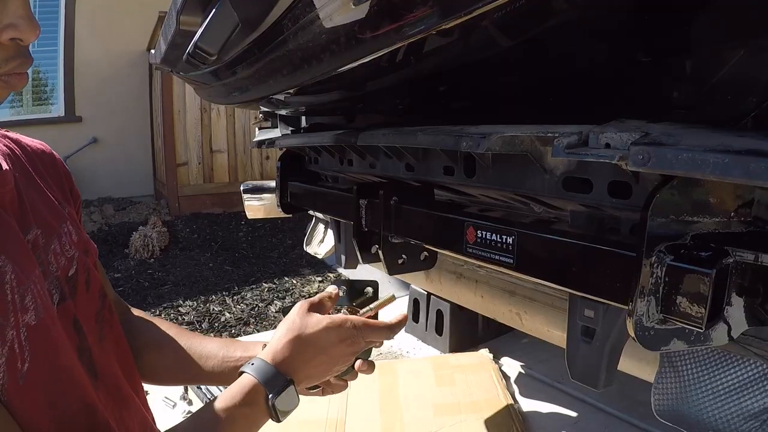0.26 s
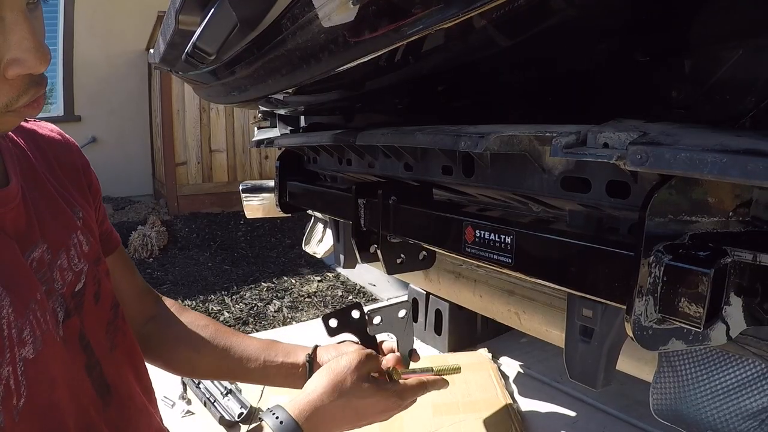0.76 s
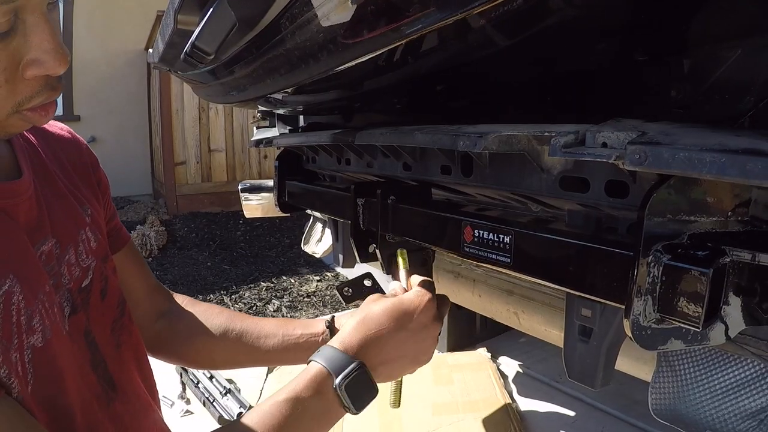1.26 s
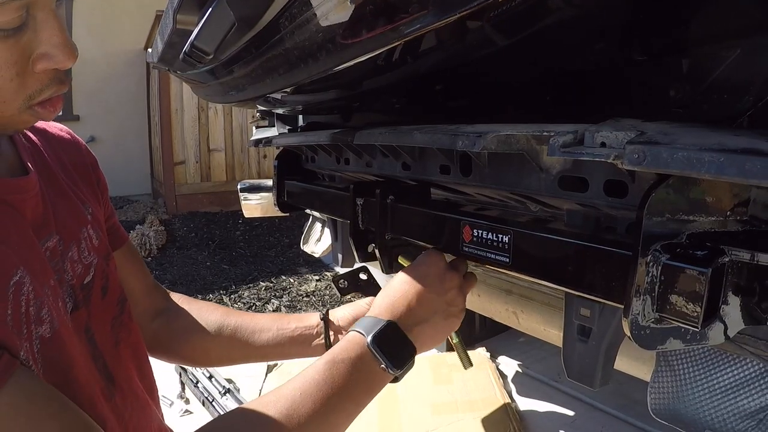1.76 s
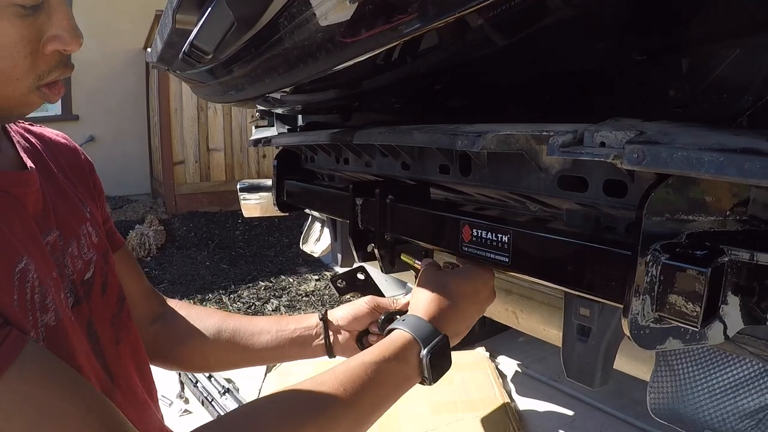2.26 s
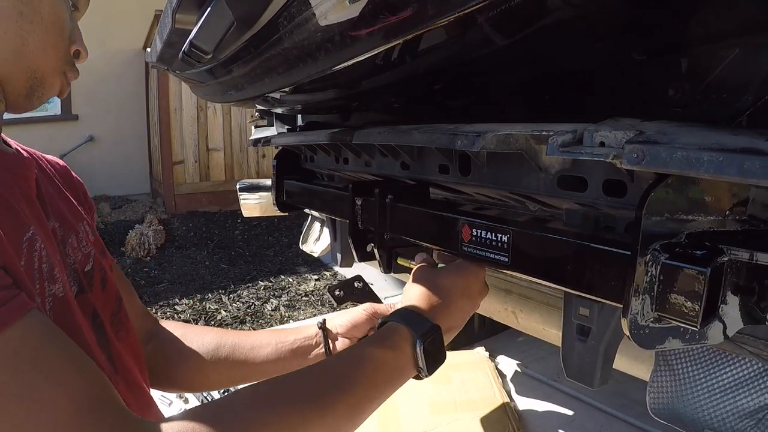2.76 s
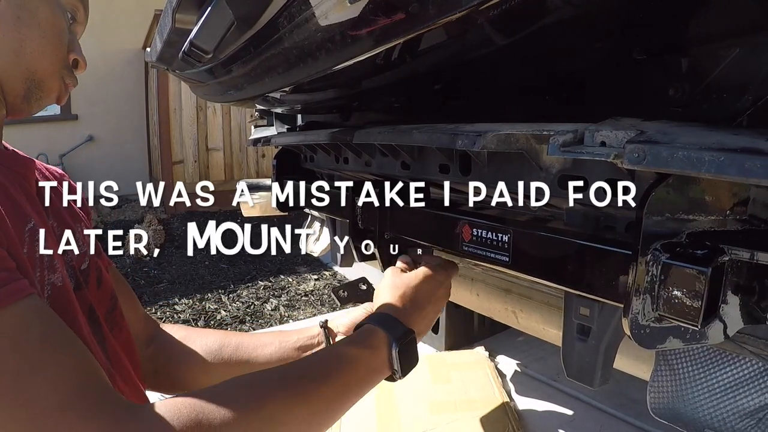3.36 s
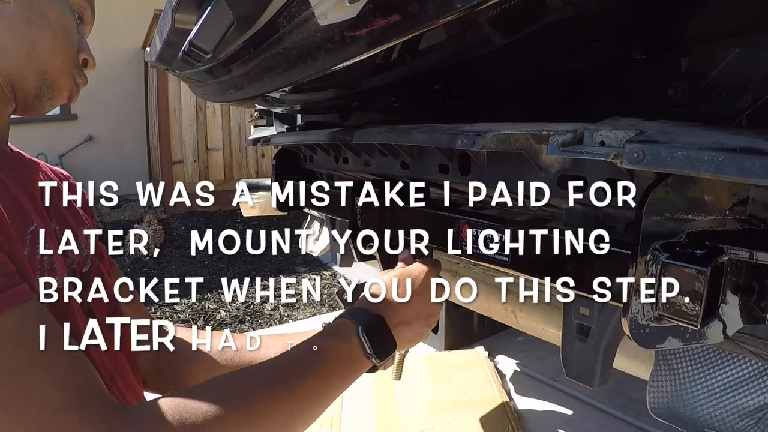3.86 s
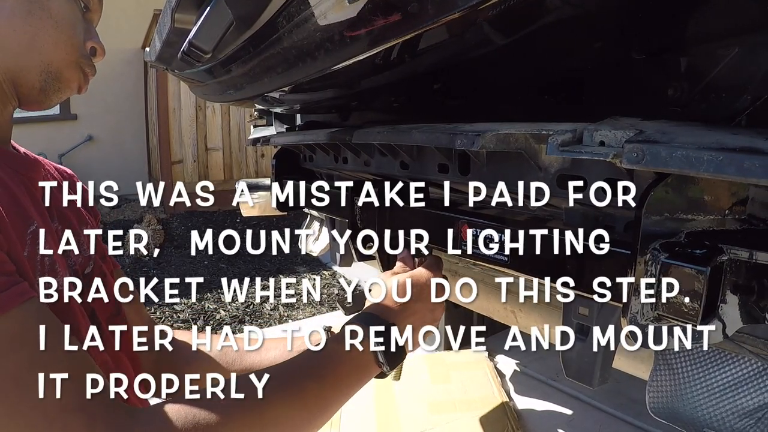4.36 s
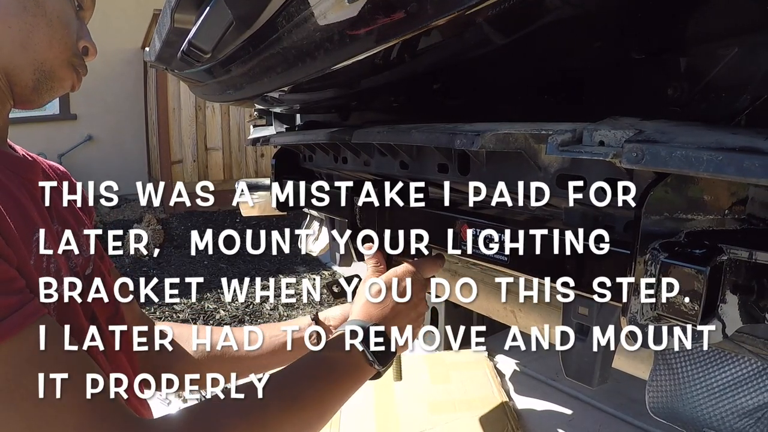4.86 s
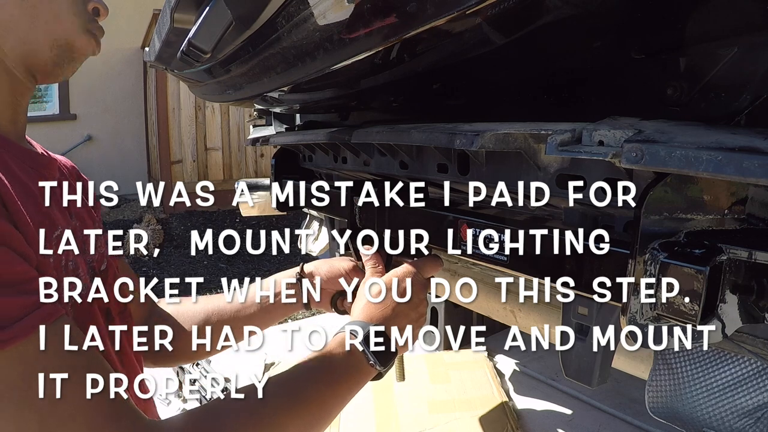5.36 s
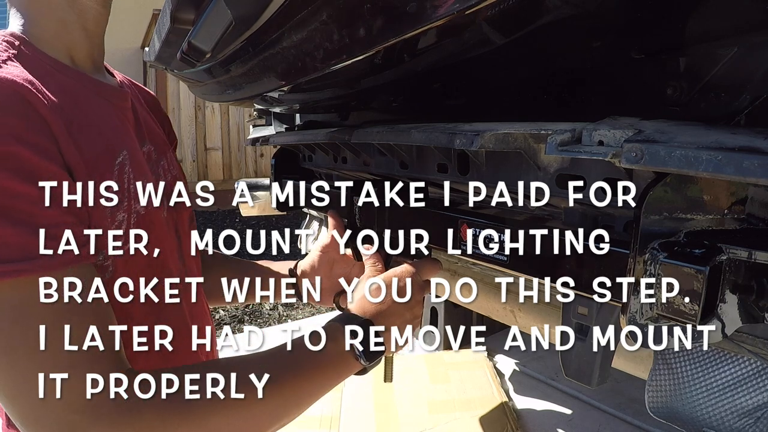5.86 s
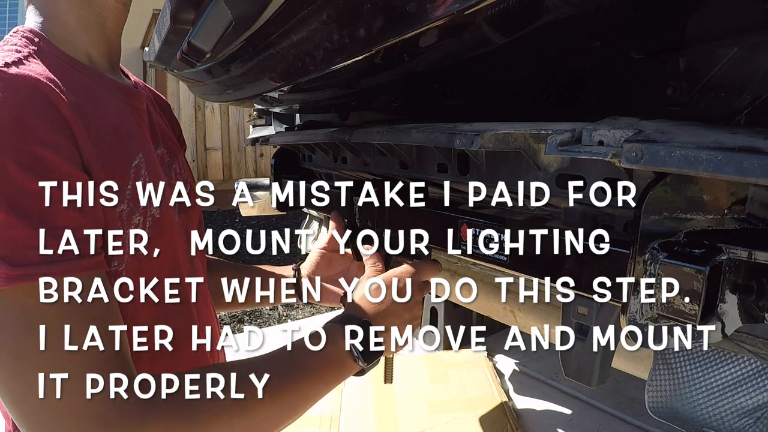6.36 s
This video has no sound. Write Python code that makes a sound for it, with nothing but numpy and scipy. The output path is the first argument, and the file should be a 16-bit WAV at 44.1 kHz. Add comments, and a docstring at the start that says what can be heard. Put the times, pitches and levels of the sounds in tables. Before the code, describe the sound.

Steel parts are handled close by, slightly to the right, under a truck outdoors. Low wind rumble on the microphone, a faint town hiss and a distant engine drone run throughout; the engine dips in pitch at first, then slowly climbs. From about 0.4 seconds a plate clinks lightly, with small ticks. Between 1 and 1.7 seconds a bracket gives a quick run of brighter, ringing clinks. From 2.3 to 3.6 seconds come harder metallic strikes with thuds in the frame, the strongest near 2.7, 3 and 3.6 seconds, and bolt threads rasp briefly around 3 seconds as the wind grows. A few duller knocks follow near 4 seconds, then the handling pauses and the engine swells around 4.5 seconds. At 5.5 seconds a bolt knocks sharply several times, a hand hisses faintly along the steel, and lighter knocks continue until about 6.3 seconds.

```python
"""Steel clinks, knocks and scrapes close by: hands fit a plate, a bracket and long bolts under a truck.
Each blow cracks, rings the parts that touch and thuds in the frame; a bolt's threads rasp through
their hole, and a hand hisses along the steel. Down the street an engine slows, then pulls away
with a rising drone, over wind rumble and the hiss of the town."""
import sys
import numpy as np
from scipy import signal
from scipy.fft import rfft, irfft, next_fast_len
from scipy.io import wavfile
from scipy.ndimage import uniform_filter1d

SR = 44100
rng = np.random.default_rng(int(sys.argv[2]) if len(sys.argv) > 2 else 0)


def generate_wav(sig):
    """Save sig (samples, or channels by samples) to the path in sys.argv[1] as 16-bit PCM at SR."""
    pcm = np.round(np.clip(np.atleast_2d(sig).T, -1, 1) * 32767).astype(np.int16)
    wavfile.write(sys.argv[1], SR, pcm)


N = 291501
TIME = np.arange(N) / SR
SIDE = np.array([[.5], [-.5]])  # splits a level or phase offset between left and right

# The modes of the three steel parts. Each row: pitch in Hz, level in dB, T60 in seconds.
PLATE_MODES = [(1325, -7, .16), (1755, -12, .14), (2130, -9, .12), (2225, 3, .17), (2280, -3, .13),
               (2465, -13, .18)]
BRACKET_MODES = [(3500, 1, .18), (3607, -9, .13), (5000, -14, .13), (6340, -15, .09), (6720, -17, .07),
                 (7106, -10, .14), (7320, -15, .09), (9000, -28, .06), (11300, -31, .06), (12600, -34, .05)]
BOLT_MODES = [(2320, 1, .26), (2896, -1, .26), (3585, -2, .2), (5015, -15, .24), (6870, -20, .13),
              (7300, -14, .12)]
PARTS = {"plate": PLATE_MODES, "bracket": BRACKET_MODES, "bolt": BOLT_MODES}
# The tone of steel meeting steel. Each row: frequency in Hz, level in dB.
CRACK_EQ = [(150, -35), (600, -17), (2000, 7.5), (4500, 2), (7700, -4), (8300, -14), (11000, -27),
            (15000, -52)]


def clinks():
    """Steel on steel: a snap, a crack and a rough tail, while the frame thuds and the parts ring."""
    # The blows. Each row: start in seconds, crack level in dB, hardness in dB per octave,
    # part struck, ring level in dB, thud level in dB.
    strikes = [(0.3902, -23, -0.5, "plate", -29.5, -30), (0.457, -25, 9, "plate", -35.5, -42),
               (0.6072, -38, 21, "plate", -36, -44.5), (1.034, -10.5, -5, "both", -19.5, -27),
               (1.1951, -12, 7.5, "bracket", -14.5, -36.5), (1.262, -21, -3.5, "both", -29.5, -45),
               (1.396, -17, -18, "both", -26.5, -40), (1.4393, -12.5, 4, "bracket", -22.5, -33.5),
               (1.5222, -11, 7, "bracket", -17, -35.5), (1.6232, -5.5, 8, "bracket", -20.5, -43.5),
               (1.6429, -5.5, 10, "bolt", -37, -36.5), (2.299, -22, -7.5, "both", -29.5, -31),
               (2.311, -21, 0.5, "both", -33, -41), (2.446, -28.5, 2, "bracket", -41, -65),
               (2.5663, -13.5, -2, "both", -31, -31), (2.597, -25, -19.5, "both", -43, -35.5),
               (2.715, -17.5, -8, "both", -36, -63), (2.726, -2.5, 4.5, "both", -19, -21.5),
               (2.933, -28, -5.5, "bracket", -22.5, -30.5), (2.9548, -3.5, 23.5, "both", -19, -30.5),
               (3.035, -16, 5, "bracket", -49, -27), (3.135, -6.5, 24, "both", -22.5, -31),
               (3.2219, -9.5, 5, "bracket", -24, -31), (3.3265, -17, 8, "bracket", -30, -43.5),
               (3.551, -7.5, -5, "bracket", -9, -28), (3.895, -29, -8.5, "bolt", -51.5, -33),
               (4.12, -11, -8.5, "bolt", -57, -28), (5.5174, -1, -8, "bolt", -23.5, -29.5),
               (5.5445, -8, -6.5, "bolt", -28, -24.5), (5.6061, -8.5, -7, "bolt", -28.5, -24),
               (5.778, -19.5, -4, "bolt", -38, -30.5), (6.0115, -15.5, -8, "bolt", -35, -27),
               (6.332, -20, -8.5, "bolt", -39.5, -28)]
    # Touching parts shake each other. For each part struck: gain in dB of plate, bracket and bolt.
    coupling = {"plate": (0, -15, -13), "bracket": (-7.5, 0, -21), "bolt": (-9, 0.5, 0),
                "both": (0.013, 0, -23)}
    pressed_s, gripped_s = 1.5, 5.7  # pressed to the frame, then held tighter, the parts die faster
    out = np.zeros((2, N))
    for start, crack_db, hardness, part, ring_db, thud_db in strikes:
        crack = burst(CRACK_EQ, hardness, t60=.047)
        snap = undb(5) * burst(CRACK_EQ, hardness, t60=.005)
        thud = undb(thud_db) * frame_thud()
        crunch = undb(-13) * burst(CRACK_EQ, tilt_db=-8, t60=.24)
        hit = undb(crack_db) * (crack + snap + crunch) + thud
        damp = 1.5 if start > gripped_s else 1.41 if start > pressed_s else 1
        ring_tilt = .68 * np.clip(hardness, -1, 12)  # harder blows ring brighter
        for gain_db, modes in zip(coupling[part], PARTS.values()):
            hit += undb(ring_db + gain_db) * ring(brighten(modes, ring_tilt), damp)
        add_contact(out, start, hit)
    return out


def bolt_song(hz=7220, t60=.54):
    """Two hard blows leave a loose bolt singing along its length."""
    # The singing notes. Each row: start in seconds, level in dB.
    notes = [(2.728, -36), (3.551, -38)]
    t = np.arange(SR // 2) / SR
    out = np.zeros(N)
    for start, db in notes:
        out[int(start * SR):][:len(t)] += undb(db - 60 * t / t60) * np.sin(2 * np.pi * hz * t)
    return out


def knocks():
    """Held parts and knuckles bump the frame: a thud with a dull crack."""
    # The bumps. Each row: start in seconds, level in dB.
    bumps = [(2.497, -27.5), (2.849, -30.5), (3.35, -26), (4.032, -29), (4.227, -26.5), (5.648, -25.5),
             (5.683, -25.5), (5.752, -21), (5.889, -31), (6.224, -32.5)]
    out = np.zeros((2, N))
    for start, db in bumps:
        knock = undb(-7.5) * frame_thud() + burst(CRACK_EQ, tilt_db=-12, t60=.047)
        add_contact(out, start, undb(db) * knock)
    return out


def ticks():
    """Small parts touch lightly: short, high pings of band-limited noise."""
    # The touches. Each row: start in seconds, level in dB, pitch in Hz.
    touches = [(.628, -37, 7000), (0.729, -33, 4670), (.797, -37.5, 5230), (0.903, -30, 3600),
               (2.288, -31.5, 4700), (4.201, -30, 4300)]
    out = np.zeros((2, N))
    for start, db, hz in touches:
        band = [(hz / 2, -60), (hz / 1.4, -3), (hz * 1.23, -3), (hz * 2, -60)]
        add_contact(out, start, undb(db) * burst(band, tilt_db=0, t60=.07))
    return out


def bolt_drag(catches_per_s=280):
    """Threads catch on the edge of a hole: dense, uneven ticks shake every body, with grit on top."""
    # How hard the bolt bears on the edge. Each row: start, swell time and fade time in seconds,
    # then peak level, swell depth and fade depth in dB.
    strokes = [(2.477, 0.077, 0.043, -38.5, 18, 33), (2.921, 0.039, 0.053, -17, 27, 28),
               (3.033, 0.062, 0.1, -13.5, 9, 16)]
    # The balance of the scrape: a level in dB for each body and for the grit.
    mix_db = {"plate": -9, "bracket": -4, "bolt": -10, "frame": -4, "grit": -6}
    pressure = np.zeros(N)
    for start, swell, fade, peak_db, swell_db, fade_db in strokes:
        ramp_db = [peak_db - swell_db, peak_db, peak_db - fade_db]
        pressure += undb(np.interp(TIME - start, [0, swell, swell + fade], ramp_db, -200, -200))
    grit = colour(stereo_noise(N, alike=.62) * undb(3 * wander(150)), CRACK_EQ)
    out = level(grit, mix_db["grit"]) * pressure
    bodies = {name: ring(brighten(modes, tilt_db=2), damp=2.2) for name, modes in PARTS.items()}
    # Light ticks barely move the low end of the frame.
    bodies["frame"] = colour(frame_thud(), [(100, 5.5), (1300, -2), (2600, -15.5)], tilt_db=5)
    for name, body in bodies.items():
        catches = (rng.random(N) < catches_per_s / SR) * undb(5 * rng.exponential(size=N))
        catches *= np.sign(rng.standard_normal(N))
        response = level(body, mix_db[name]) / np.sqrt(body.shape[1])
        out += signal.fftconvolve(response, (level(catches, 0) * pressure)[None])[:, :N]
    return out


def frame_thud():
    """The struck underbody: loose, shifting modes in a wash of clatter."""
    # The frame's main modes. Each row: pitch in Hz, level in dB, T60 in seconds.
    frame_modes = [(258, 1, .2), (413, -8, .25), (638, -14, .25), (1000, -3, .17), (1290, -2, .1),
                   (1843, -14, .1), (2087, -15, .05)]
    # Its countless damped modes, blurred into noise. Each row: frequency in Hz, level in dB.
    clatter_eq = [(90, 0), (220, 13.5), (1200, 4), (2500, -14), (5000, -44.5)]
    tones = ring(frame_modes, scatter=.0288, rattle_db=3.5)
    return tones + undb(10.5) * burst(clatter_eq, tilt_db=0, t60=.34)


def hand_slide():
    """A hand slides along the steel: a thin, slightly uneven friction hiss."""
    # The swell of the stroke. Each row: time in seconds, level in dB.
    stroke = [(5.62, -79), (5.66, -52), (5.73, -45), (5.8, -48), (5.89, -58), (5.91, -78)]
    # The tone of the friction. Each row: frequency in Hz, level in dB.
    friction_eq = [(2500, -19), (4500, -14), (6600, -6.5), (8500, -18.5), (11000, -42)]
    hiss = level(colour(stereo_noise(N, alike=.4), friction_eq), 0) * undb(2 * wander(43))
    return hiss * undb(curve(stroke, outside=-200))


def engine():
    """A far exhaust drones at its firing rate, swelling and sinking on its way between the houses."""
    # The swells of the firing tone and of its second harmonic. Each row: time in seconds, level in dB.
    firing_swells = [(0, -24), (.35, -20), (.48, -23), (.7, -18), (1, -32.5), (1.25, -21.5), (1.95, -32),
                     (2.15, -26.5), (2.5, -31.5), (3.5, -27), (4, -25), (4.2, -31), (4.45, -14),
                     (4.85, -24), (5.1, -20.5), (6.12, -43.5), (6.3, -25), (6.61, -29)]
    second_swells = [(0, -52.5), (.55, -29), (.85, -29.5), (1.15, -36.5), (6.61, -47)]
    low_hz, turn_s, sag_hz_per_s, climb_hz_per_s = 70.55, .55, 32, 5.7
    since_turn = TIME - turn_s
    firing_hz = low_hz + np.maximum(-sag_hz_per_s * since_turn, climb_hz_per_s * since_turn)
    firing_hz = uniform_filter1d(firing_hz, int(.28 * SR), mode="nearest")  # rounds the turn
    phase = 2 * np.pi * np.cumsum(firing_hz * (1 + .0045 * wander(13))) / SR
    firing_db = curve(firing_swells)
    out = np.zeros((2, N))
    for harmonic, db in ((1, firing_db), (2, curve(second_swells)), (4, firing_db - 37.5)):
        gain = undb(db + 2.2 * wander(8.8) - 2 * SIDE)
        out += np.sqrt(2) * gain * np.sin(harmonic * (phase + .11 * SIDE))
    return out


def wind():
    """Wind buffets the microphone: a low rumble, mostly unrelated left and right."""
    # The strength of the wind. Each row: time in seconds, level in dB.
    strength = [(0, -31), (2.5, -37.5), (2.9, -22.5), (4.3, -28), (6.61, -29)]
    rumble_eq = [(10, -8), (52, 0), (104, -5), (250, -30), (2000, -90)]
    gusts = colour(stereo_noise(N, alike=.25), rumble_eq) * undb(3 * wander(12))
    return level(gusts, 0) * undb(curve(strength) - 2.4 * SIDE)


def town():
    """The far hiss of the town: its low band wavers under a nearly steady top."""
    # The tone of the town. Each row: frequency in Hz, level in dB.
    town_eq = [(65, -14), (110, -8), (177, -18), (301, -26.5), (582, -29), (1440, -29.5), (3340, -44.5),
               (9540, -50), (12500, -59.5), (15000, -99)]
    low = colour(stereo_noise(N, alike=.25), [(300, .5), (700, -9)]) * undb(3.1 * wander(11))
    high = colour(stereo_noise(N, alike=.0086), [(200, -19), (500, -3)]) * undb(.12 * wander(.23))
    hiss = colour(low + high, [(40, -62.5)] + town_eq)
    return level(hiss, -37) * undb(-1.5 * SIDE)


def ring(modes, damp=1, scatter=.0041, rattle_db=4, seconds=.3):
    """A struck body rings; each blow varies the pitch, decay, strength and direction of every mode."""
    hz, db, t60 = np.transpose(modes)[:, :, None]
    t = np.arange(int(seconds * SR), dtype=np.float32) / SR
    detune, strength, pan, skew, loss = rng.standard_normal((5, len(modes), 1))
    decay_rate = np.log(1000) * damp / t60 * undb(1.2 * loss)
    waves = np.exp((2j * np.pi * hz * (1 + scatter * detune) - decay_rate) * t)
    # Loose parts keep brushing their neighbours, so every mode flutters within milliseconds.
    steps = rng.standard_normal((len(modes), len(t) // 256 + 1))
    flutter = uniform_filter1d(np.repeat(steps, 256, axis=1)[:, :len(t)], size=256)
    waves *= undb(rattle_db * flutter)
    gains = undb(db + 2 * strength + 1.58 * pan * SIDE.T) * np.exp(.6j * skew * SIDE.T)
    return (gains.T @ waves).imag * np.minimum(t / .0015, 1)


def burst(eq, tilt_db, t60, seconds=.3):
    """Coloured noise that starts sharply and falls 60 dB in t60 seconds."""
    t = np.arange(int(seconds * SR)) / SR
    noise = level(colour(stereo_noise(len(t), alike=.69), eq, tilt_db), -9)
    return noise * undb(-60 * t / t60) * np.minimum(t / .00027, 1)


def add_contact(out, start, sound, skid_s=.005):
    """Mix in a sound as a tiny skid: a first touch and three weaker ones."""
    touches = np.zeros(SR // 40)
    delay, strength = rng.random((2, 4))
    touches[(skid_s * delay * np.arange(4) * SR).astype(int)] = .65 * strength
    touches[0] = .66
    sound = signal.fftconvolve(sound, touches[None] / np.linalg.norm(touches))
    i = int(start * SR)
    out[:, i:i + sound.shape[1]] += sound[:, :N - i]


def brighten(modes, tilt_db):
    """Tilt the levels of modes by tilt_db per octave about 3 kHz."""
    return [(hz, db + tilt_db * np.log2(hz / 3000), t60) for hz, db, t60 in modes]


def colour(x, eq, tilt_db=0):
    """Equalise by (Hz, dB) points, plus a tilt per octave about 3 kHz that levels off at 8.5 kHz."""
    size = next_fast_len(x.shape[-1], real=True)
    hz = np.maximum(np.fft.rfftfreq(size, 1 / SR), 10)
    eq_hz, eq_db = np.transpose(eq)
    db = np.interp(np.log(hz), np.log(eq_hz), eq_db) + tilt_db * np.log2(np.minimum(hz, 8500) / 3000)
    return irfft(rfft(x, size) * undb(db), size)[..., :x.shape[-1]]


def stereo_noise(count, alike):
    """White noise whose left and right have the correlation `alike`."""
    common, opposed = rng.standard_normal((2, count))
    return np.sqrt((1 + alike) / 2) * common + np.sqrt((1 - alike) / 2) * opposed * 2 * SIDE


def wander(rate):
    """A smooth random drift, `rate` steps a second, with a spread near 1."""
    hold = int(SR / rate)
    steps = np.repeat(rng.standard_normal(N // hold + 1), hold)
    return 1.13 * uniform_filter1d(uniform_filter1d(steps, hold), hold)[:N]


def curve(points, outside=None):
    """Join (seconds, value) points with straight lines over the whole scene."""
    return np.interp(TIME, *np.transpose(points), left=outside, right=outside)


def level(x, db):
    """Scale to an RMS level in dB."""
    return x * undb(db) / np.sqrt(np.mean(x ** 2))


def undb(db):
    """Decibels to gain."""
    return 10 ** (np.asarray(db) / 20)


def scene():
    """The near handwork, a little to the right, in front of engine, wind and town."""
    # The handwork's phase across the stereo microphone. Each row: frequency in Hz, left lead in radians.
    phase_lead = [(200, -0.27), (1300, 1.17), (2200, 0.4), (6500, -0.85), (8800, -2), (13000, -6)]
    hands = clinks() + bolt_song() + knocks() + ticks() + bolt_drag() + hand_slide()
    size = next_fast_len(N, real=True)
    hz = np.fft.rfftfreq(size, 1 / SR)
    lead_hz, lead_rad = np.transpose(phase_lead)
    lead = np.interp(np.log(hz + 1), np.log(lead_hz), lead_rad)
    hands = irfft(rfft(hands, size) * np.exp(1j * lead * SIDE), size)[:, :N]
    return hands * undb(-2 * SIDE) + engine() + wind() + town()


def record(dry):
    """Fade in quickly after a moment of silence, round the loudest peaks and cut the top."""
    start_s, top_hz = .028, 15100
    fade_in = np.clip((TIME - start_s) / .012, 0, 1)
    rounded = np.tanh(.84 * dry * fade_in) / .75
    return signal.sosfilt(signal.ellip(10, .2, 90, top_hz, fs=SR, output="sos"), rounded)


dry = scene()
out = record(dry)
generate_wav(out)
```